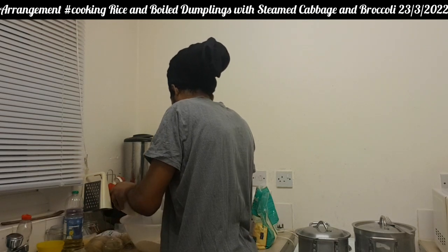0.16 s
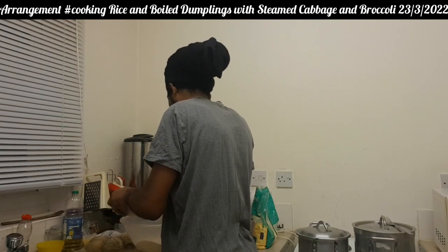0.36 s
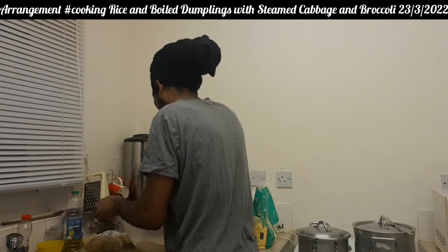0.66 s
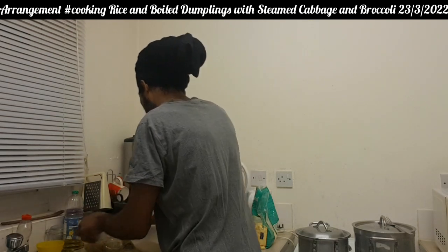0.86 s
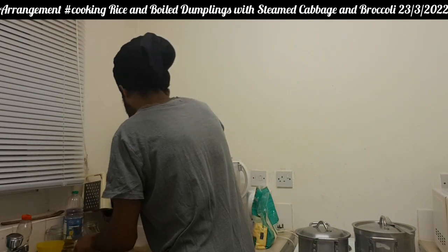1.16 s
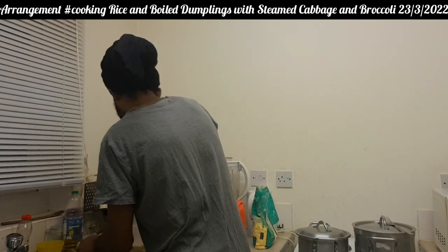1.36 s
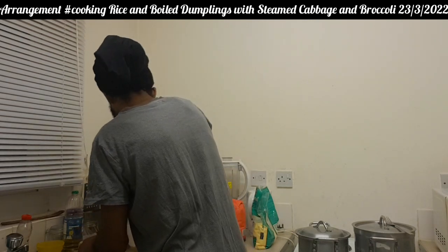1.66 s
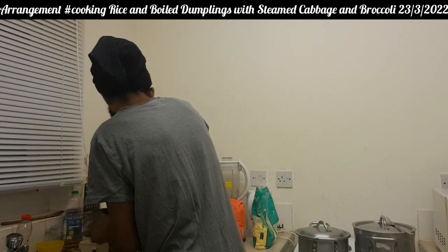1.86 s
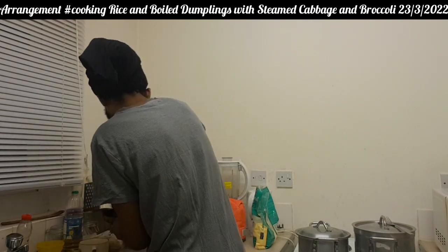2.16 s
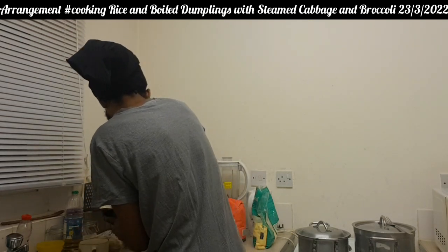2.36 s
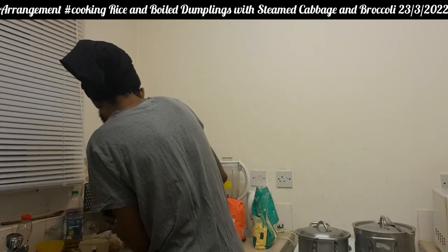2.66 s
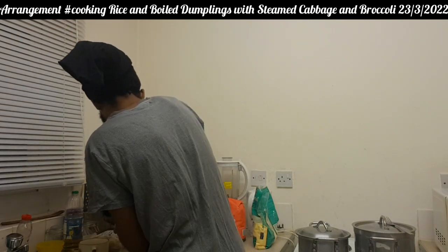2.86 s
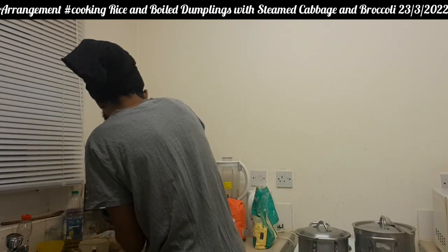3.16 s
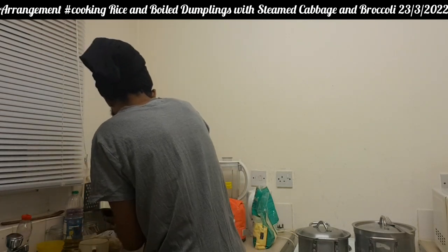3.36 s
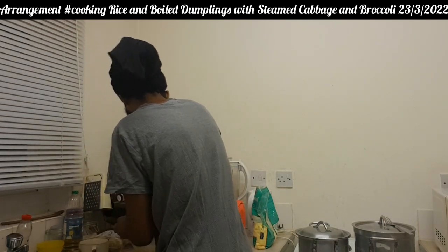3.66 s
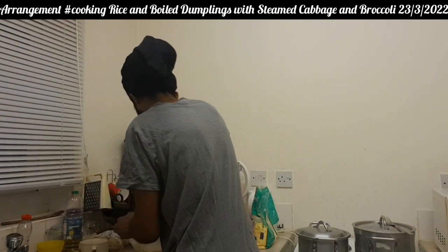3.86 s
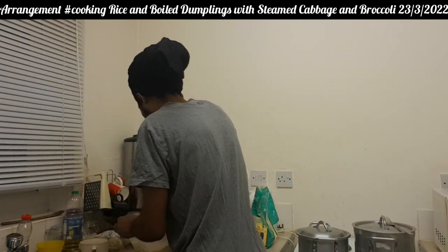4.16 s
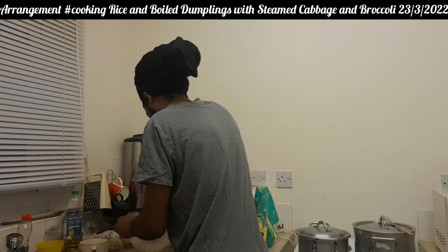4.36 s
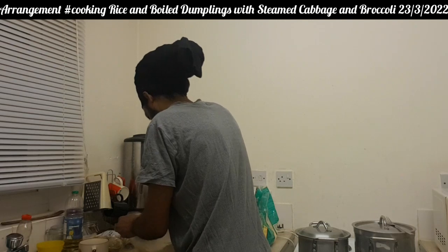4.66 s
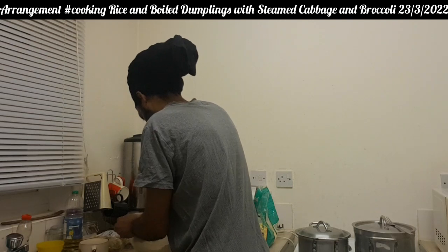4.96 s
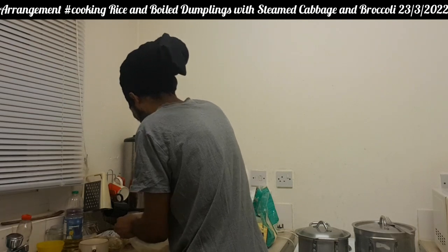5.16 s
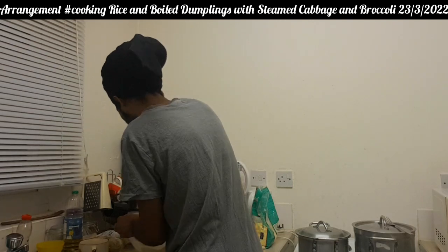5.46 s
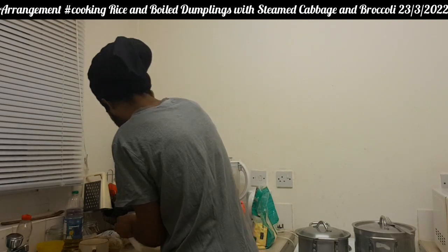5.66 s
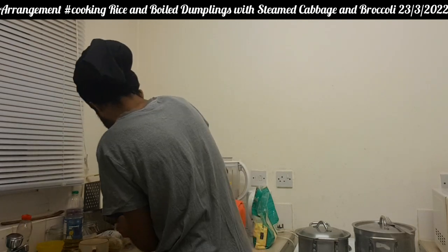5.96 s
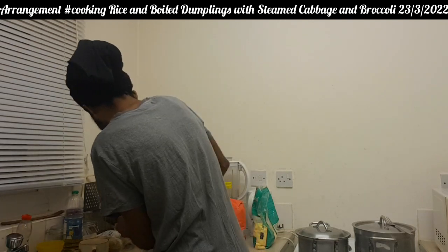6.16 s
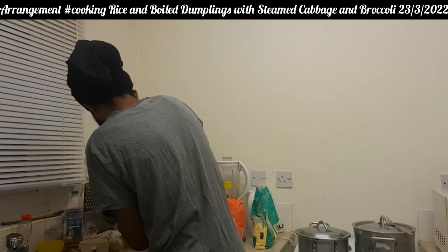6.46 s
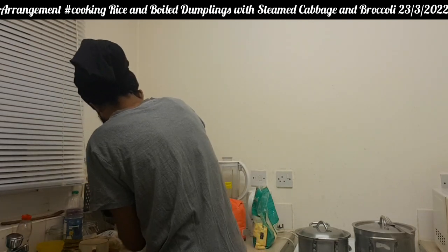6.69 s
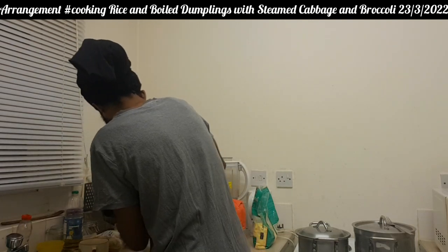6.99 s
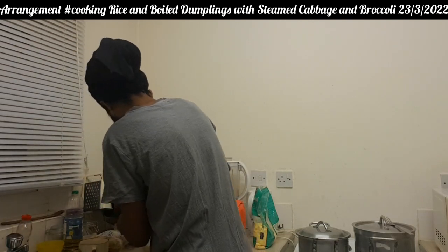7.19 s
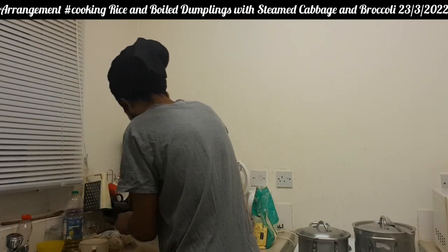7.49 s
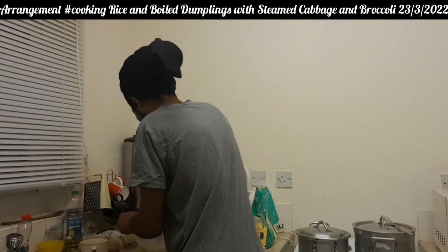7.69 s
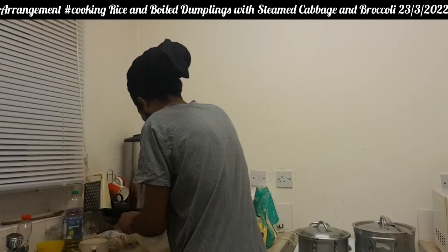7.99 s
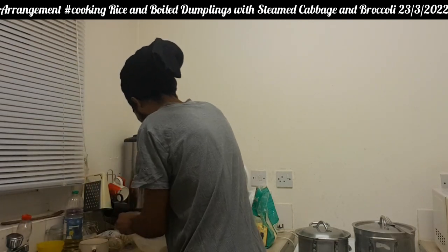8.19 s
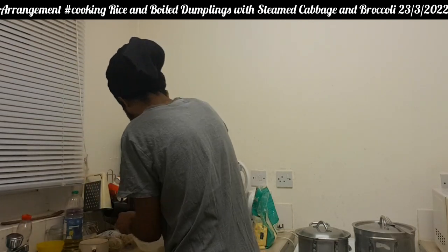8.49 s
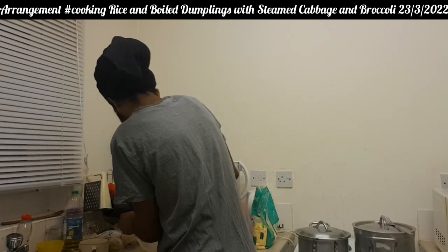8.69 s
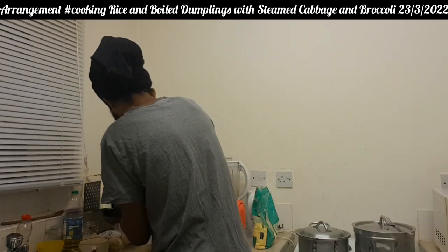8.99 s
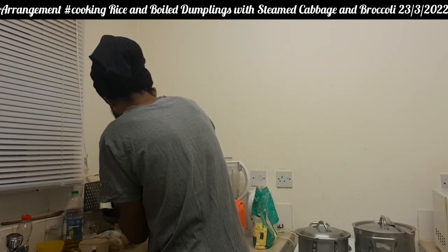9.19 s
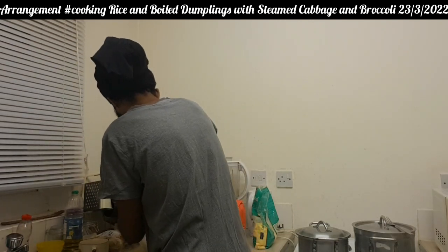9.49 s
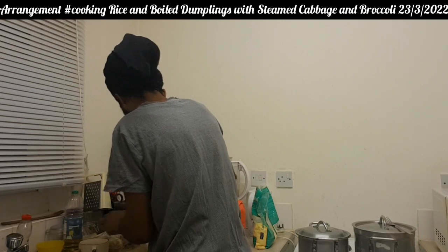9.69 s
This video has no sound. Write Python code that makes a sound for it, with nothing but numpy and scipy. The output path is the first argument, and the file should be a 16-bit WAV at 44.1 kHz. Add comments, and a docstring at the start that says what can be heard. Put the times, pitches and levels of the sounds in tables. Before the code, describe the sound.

Dry, grainy hand strokes against a bowl, with a thin flour hiss and a muted ring from the wall. A single hard knock early on stands far above everything else, its clack and boom dying quickly. Then quiet, uneven rubbing continues to the end, with a double tap midway and small bumps. Heard in stereo from a few steps off in a small reflective kitchen with faint, slowly swelling room noise.

```python
"""Hands mix and press flour dough in a bowl on a kitchen counter, a few steps from a two-port microphone.
A faint, slowly swelling room noise lies under everything, and a faint stroke is already under way.
Harder strokes follow, grains scraping and ringing the bowl wall under a dry flour hiss; at 1.27 s comes
the loudest knock: bowl, rim and clack ring from a short push, and the counter booms.
Then strokes overlap to the end among softer knocks, all blurred by decaying noise tails of a small hard room."""
import sys
import numpy as np
from scipy import signal
from scipy.fft import rfft, irfft, next_fast_len
from scipy.io import wavfile
from scipy.ndimage import uniform_filter1d

SR = 44100
rng = np.random.default_rng(int(sys.argv[2]) if len(sys.argv) > 2 else 0)


def amplitude_ratio(level_db):
    """Convert a level in decibels to the matching linear amplitude (field) ratio."""
    exponent = np.asarray(level_db, float) / 20
    return 10 ** exponent


def wav_record(signal):
    """Record a signal, one row per channel, as 16-bit PCM in the file named by sys.argv[1]."""
    frames = np.transpose(np.atleast_2d(signal))
    bounded = np.clip(frames, -1, 1)
    # unit amplitude maps onto the largest positive 16-bit level
    quanta = np.round(bounded * 32767).astype(np.int16)
    wavfile.write(sys.argv[1], SR, quanta)


N = 433944

# Strokes of the hands. Each row: start in seconds, length in seconds, share of the length before the peak (0-1),
# then relative levels in dB of the grit, the dry flour hiss and the ring of the bowl wall.
HAND_STROKES = [(-.12, 0.54, 0.26, -74, -82, -75), (0.303, 0.31, 0.6, -56.5, -71, -59),
                (0.429, 0.19, 0.3, -48.5, -77, -51.5), (0.545, 0.19, 0.38, -46.5, -67.5, -49.5),
                (0.823, 0.33, .42, -54.5, -70.5, -55.5), (1.261, 0.33, 0.12, -45, -65, -43.5),
                (1.581, 0.26, .3, -58.5, -72, -52.5), (1.661, 0.36, 0.4, -50.5, -69.5, -60),
                (2.004, 0.053, 0.13, -53.5, -74, -70), (2.06, .25, .32, -54.5, -70.5, -62),
                (2.355, 0.42, 0.1, -54, -70.5, -63.5), (2.857, 0.22, 0.4, -53.5, -71.5, -55),
                (3.015, 0.37, 0.27, -57, -78, -55), (3.171, 0.31, 0.46, -55.5, -69, -68),
                (3.452, 0.32, 0.24, -63.5, -74.5, -91), (3.808, 0.32, 0, -63, -79, -75),
                (4.179, 0.31, 0.31, -56.5, -75.5, -58), (4.493, 0.29, 0.47, -56, -68.5, -67.5),
                (4.827, 0.35, 0.23, -56, -67, -65.5), (5.183, 0.34, 0.1, -53, -67.5, -63),
                (5.456, 0.06, 0.47, -55, -87, -53), (5.52, 0.28, 0.06, -52, -68, -75),
                (5.635, 0.39, 0.2, -56, -70, -59), (5.816, 0.15, 0.68, -59.5, -81, -66.5),
                (6.077, 0.37, 0.19, -57, -71, -65), (6.245, 0.24, 0.45, -58.5, -75, -65),
                (6.5, 0.19, 0.38, -60.5, -75, -59), (6.61, 0.56, 0.03, -55.5, -73, -66),
                (6.97, 0.33, 0.2, -56.5, -71, -60), (7.335, 0.3, 0.14, -53.5, -69, -57),
                (7.483, 0.28, 0.53, -57, -70, -64), (7.739, .07, 0, -57.5, -73.5, -67),
                (7.77, 0.36, 0.25, -53, -68, -58), (7.98, 0.75, 0.05, -53.5, -66.5, -62.5),
                (8.146, .22, 0.28, -47.5, -62.5, -57), (8.265, 0.17, 0.7, -52.5, -64.5, -58),
                (8.596, 0.36, 0.1, -53, -69.5, -72), (8.723, 0.23, 0.58, -56.5, -72, -66),
                (9.015, 0.25, 0.65, -51.5, -66.5, -67), (9.167, 0.23, 0.34, -55, -71, -68),
                (9.288, 0.4, 0.25, -56.5, -71.5, -66.5), (9.573, 0.2, 0.34, -66.5, -81.5, -62)]
# Tones of the bowl's body. Each row: frequency in Hz, relative level in dB, time to fall 60 dB in seconds.
BOWL_MODES = [(215, -3, 0.091), (261, -0.5, 0.048), (321.5, -0.5, .08), (369.6, -2.5, 0.093),
              (451.3, 0, 0.062), (468, -7, 0.35), (493, 0.5, 0.12), (556.6, -1.5, 0.089)]
# Tones of the counter. Each row: frequency in Hz, relative level in dB, time to fall 60 dB in seconds.
COUNTER_MODES = [(115.7, -8, 0.12), (137.7, 0, 0.3), (150.1, -16.5, 0.28), (157, -11, 0.26)]
# Tones of the bowl's rim. Each row: frequency in Hz, relative level in dB, time to fall 60 dB in seconds.
RIM_MODES = [(686, -2.5, 0.049), (767, -5.5, 0.059), (871, -4, .06), (1057, -4.5, 0.041)]
# Decay of the kitchen. Each row: frequency in Hz, time to fall 60 dB in seconds.
KITCHEN_DECAY = [(100, 0.59), (400, 0.28), (1200, 0.45), (3000, 0.22), (8000, 0.17), (13000, 0.1)]


def evened(x):
    """Scales to rms 1."""
    return x / np.sqrt(np.mean(x ** 2) + 1e-20)


def read(points, hz):
    """Reads a curve of (Hz, value) rows on a log-frequency axis."""
    f, value = np.transpose(points)
    return np.interp(np.log(hz + 1), np.log(f + 1), value)


def coloured(x, spectrum):
    """Filters x by a spectrum in dB, then scales it to rms 1."""
    size = next_fast_len(N)
    gain = amplitude_ratio(read(spectrum, np.fft.rfftfreq(size, 1 / SR)))
    return evened(irfft(rfft(x, size) * gain, size)[..., :N])


def wander(samples):
    """Random curve of rms 1, smoothed over this many samples."""
    return evened(uniform_filter1d(rng.standard_normal(N), size=samples))


def ring(modes):
    """The dying tones of a part, peak 1; neighbours start in opposite directions."""
    t = np.arange(SR // 3)[:, None] / SR
    hz, db, t60 = np.transpose(modes)
    tones = amplitude_ratio(db - 60 * t / t60) * np.sin(2 * np.pi * hz * t)
    total = tones @ (-1.) ** np.arange(len(hz))
    return total / abs(total).max()


def room_noise():
    """Faint two-sided noise of a fixed colour that swells slowly."""
    # Spectrum of the room noise. Each row: frequency in Hz, relative density in dB per Hz.
    air = [(12, -40.5), (20, 13), (186, -6), (290, -13), (748, -14), (1500, -14), (1630, -7.5), (1780, -14),
           (3370, -21.5), (6950, -33.5), (10000, -33), (12000, -29.5), (15600, -23), (16100, -57.5)]
    swell = amplitude_ratio(0.44 * wander(12000))
    return amplitude_ratio(-64) * swell * coloured(rng.standard_normal((2, N)), air)


def echoes(count):
    """Stereo room tails: strong echoes off the near walls, then a decay band by band; each spot has its own."""
    hz, t, z = signal.stft(rng.standard_normal((count, 2, SR // 2)), SR, nperseg=512)
    decay = amplitude_ratio(-60 * t / read(KITCHEN_DECAY, hz)[:, None])
    tails = signal.istft(z * decay, SR, nperseg=512)[1]
    t = np.arange(tails.shape[2]) / SR
    onset = np.minimum(t / 0.0015, 1)
    tails *= onset * (1 + 0.47 * np.exp(-t / 0.0075))
    return tails / np.sqrt((tails ** 2).sum(2).mean())


def blur(x):
    """The hands never stay put, so their reverberation keeps only its energy, dying band by band."""
    hz, t, z = signal.stft(x, SR, nperseg=512, noverlap=384)
    keep = amplitude_ratio(-120 * t[1] / read(KITCHEN_DECAY, hz))  # share of the power left after one frame
    power = np.array([signal.lfilter([0, 1 - k], [1, -k], abs(row) ** 2) for k, row in zip(keep, z)])
    real, imaginary = rng.standard_normal((2, 2, *power.T.shape)).transpose(0, 1, 3, 2)
    noise = np.sqrt(abs(power)) * (real + 1j * imaginary)
    return signal.istft(noise, SR, nperseg=512, noverlap=384)[1][:, :N]


def knocks():
    """Each blow is a short push; every part rings as hard as the blow reaches it. Returns direct, diffuse."""
    # Blows on bowl and counter. Each row: time in seconds, then relative levels in dB of the bowl body,
    # the counter boom, the rim, the clack and the dull thud.
    blows = [(0.888, -55, -65, -73, -47, -53.5), (1.269, -16, -17.5, -12, -14.5, -58),
             (1.609, -42.5, -25, -50.5, -40.5, -37), (2.002, -43.5, -49, -32.5, -33, -55),
             (2.126, -57, -54, -41, -34.5, -54), (2.527, -53, -51, -54, -63, -53),
             (2.89, -30.5, -49, -43, -41, -51), (3.071, -70, -75, -35, -31.5, -73),
             (3.155, -40.5, -48, -50, -29, -58), (4.225, -44, -52, -50, -44, -54),
             (4.512, -37, -46, -50.5, -43.5, -53), (4.836, -40, -66, -54, -34.5, -50),
             (4.85, -36.5, -47.5, -42.5, -58, -53), (5.399, -51, -70, -48, -44, -69),
             (5.472, -27.5, -38.5, -34.5, -29.5, -43), (5.543, -27.5, -39, -33, -26, -44),
             (6.093, -39, -48, -60, -28, -46), (6.252, -43.5, -46.5, -45.5, -44, -41.5),
             (6.56, -50, -48.5, -63, -49, -44.5), (7.35, -38.5, -46, -47.5, -45, -44),
             (7.745, -50, -53, -49, -49, -62), (8.004, -46.5, -57, -55, -51, -46),
             (8.167, -48.5, -69, -55, -40, -74), (8.595, -33, -43, -51, -38.5, -60),
             (8.634, -30, -40, -41, -35.5, -53), (9.081, -52.5, -57.5, -53, -55, -55),
             (9.659, -50, -61, -48, -44.5, -58)]
    # Short tones of the clack. Each row: frequency in Hz, relative level in dB, time to fall 60 dB in seconds.
    clack_modes = [(1228, -2, 0.013), (1520, 3, 0.0058), (1813, 2.5, 0.0061), (2230, 0.5, 0.0056),
                   (2800, 2.5, 0.0027), (3370, -1, 0.0031), (4340, -7, 0.0022)]
    # Low tones of the thud. Each row: frequency in Hz, relative level in dB, time to fall 60 dB in seconds.
    thud_modes = [(50, -11.5, 0.062), (79.1, 6.5, 0.23)]
    u = np.arange(200) / SR / 0.00008  # the push peaks after 0.08 ms
    push = u * np.exp(-u)
    all_modes = (BOWL_MODES, COUNTER_MODES, RIM_MODES, clack_modes, thud_modes)
    parts = np.array([np.convolve(ring(modes), push)[:SR // 3] for modes in all_modes])
    # the cupboard under the counter takes a moment to boom
    parts[1] *= np.minimum(np.arange(SR // 3) / SR / 0.033, 1)
    parts /= abs(parts).max(1)[:, None]
    direct, diffuse = np.zeros(N + SR), np.zeros((2, N + SR))
    for (seconds, *parts_db), tail in zip(blows, echoes(count=len(blows))):
        bowl, counter, rim, clack, thud = amplitude_ratio(parts_db)[:, None] * parts
        blow = amplitude_ratio(-4.5) * (bowl + rim + clack)
        bass = amplitude_ratio(1.5) * (counter + thud)  # too long a wave to scatter: it stays out of the echoes
        at = round(seconds * SR)
        direct[at:][:len(blow)] += amplitude_ratio(2.5) * blow + bass
        wet = signal.fftconvolve(blow[None], tail, axes=1)
        diffuse[:, at:][:, :wet.shape[1]] += amplitude_ratio(7) * wet
    return direct[:N], diffuse[:, :N]


def arches(peaks_db, late_share, start_db, end_db, offset_db):
    """Gain of one layer: every stroke swells to its peak and dies away; overlapping strokes add in power."""
    arch_power = 2.1  # higher = flatter top, steeper flanks
    start, length, peak = np.transpose(HAND_STROKES)[:3, :, None]
    t = np.arange(0, N / SR + .004, .002)
    u = (t - start) / length
    peak = np.clip(peak + late_share, .05, .95)
    rise_db = start_db * abs(1 - u / peak) ** arch_power
    fall_db = end_db * abs((u - peak) / (1 - peak)) ** arch_power
    down_db = np.where(u < peak, rise_db, fall_db)
    power = (amplitude_ratio(peaks_db[:, None] + offset_db - down_db) ** 2).sum(0)
    return np.interp(np.arange(N) / SR, t, np.sqrt(power))


def strokes():
    """Dense uneven grains slip along the wall and set it ringing; returns scrape, flour hiss, two-sided ring."""
    # Spectrum of the coarse scrape. Each row: frequency in Hz, relative density in dB per Hz.
    coarse_colour = [(40, -12.5), (135, 0), (200, -32.5), (700, -4.5), (1200, -1.5), (1400, 0.5),
                     (2000, -0.5), (2600, -3.5), (4000, -38), (9000, -76.5)]
    # Spectrum of the fine scrape. Each row: frequency in Hz, relative density in dB per Hz.
    fine_colour = [(800, -41), (2000, -12), (2640, -3.5), (3300, 0), (4500, -5.5), (7000, -13), (8500, -27),
                   (11000, -87.5)]
    # Spectrum of the dry flour hiss. Each row: frequency in Hz, relative density in dB per Hz.
    flour_colour = [(5000, -22), (8000, -6), (10000, -6.5), (12500, 2), (15700, 0.5), (16300, -47)]
    grit_db, hiss_db, wall_db = np.transpose(HAND_STROKES)[3:]
    coarse = arches(grit_db, late_share=.01, start_db=14, end_db=27.3, offset_db=2.3)
    fine = arches(grit_db, late_share=0.012, start_db=15.5, end_db=23.4, offset_db=0.3)
    hiss = arches(hiss_db, late_share=.03, start_db=22, end_db=22, offset_db=0.3)
    # the wall stirs faintly between strokes
    body = arches(wall_db, late_share=.08, start_db=31, end_db=32, offset_db=0.18) + amplitude_ratio(-73)
    rim = arches(wall_db, late_share=0.2, start_db=18, end_db=22, offset_db=-2.5) + amplitude_ratio(-84.5)

    grains_per_s, grain_spread_db = 7000, 1
    sizes = amplitude_ratio(grain_spread_db * np.minimum(rng.exponential(1, N), 5))
    grains = sizes * (rng.random(N) < grains_per_s / SR)
    grains *= rng.choice([-1., 1.], N)
    judder = amplitude_ratio(2.0 * wander(700) + 1.3 * wander(2500))  # the hand sticks and slips
    scrape = judder * (coarse * coloured(grains, coarse_colour) + fine * coloured(grains, fine_colour))
    flour = judder ** 0.49 * hiss * coloured(grains, flour_colour)

    rubbing = judder * rng.standard_normal((2, N))
    bowl_ring, rim_ring, counter_ring = [
        evened(signal.oaconvolve(rubbing, ring(modes)[None], axes=1)[:, :N])
        for modes in (BOWL_MODES, RIM_MODES, COUNTER_MODES)]
    wall = body * (bowl_ring + amplitude_ratio(-11.0) * counter_ring) + rim * rim_ring
    return scrape, flour, wall


def two_ports(direct, diffuse):
    """Direct sound is shared, diffuse sound is alike by frequency; then level and phase part the two ports."""
    # Likeness of the diffuse sound at the ports. Each row: frequency in Hz, likeness (0-1).
    likeness = [(60, 0.66), (150, 0.79), (300, 0.74), (500, 0.94), (1000, 0.24), (2000, 0.026),
                (5000, 0.25), (8000, 0.28), (12000, 1)]
    # Phase between the ports. Each row: frequency in Hz, lead of the left port in radians.
    left_lead = [(60, 0), (150, -.15), (300, -.45), (500, -.95), (1200, -1.4), (3000, -1.5), (6500, -1.4),
                 (9000, -.2), (16000, 0)]
    # Level between the ports. Each row: frequency in Hz, left minus right in dB.
    left_louder = [(60, 0), (130, -1), (290, -1.5), (640, -2.0), (1410, -3), (3100, -2), (6820, -9.5),
                   (15000, -3.5)]
    size = next_fast_len(N)
    hz = np.fft.rfftfreq(size, 1 / SR)
    direct = rfft(direct, size)
    left, other = rfft(diffuse, size)
    same = np.clip(read(likeness, hz), 0, 1)
    right = same * left + np.sqrt(1 - same ** 2) * other
    # each port takes half of the difference
    half = amplitude_ratio(read(left_louder, hz) / 2) * np.exp(.5j * read(left_lead, hz))
    return irfft(np.array([(direct + left) * half, (direct + right) / half]), size)[:, :N]


def scene():
    """Sums the direct sound of hands and knocks, and the diffuse sound of kitchen and wall, at the two ports."""
    blows, blow_echoes = knocks()
    scrape, flour, wall = strokes()
    # the bowl stays in its corner: one fixed short tail
    corner = echoes(count=1)[0, :, :SR // 10]
    near = amplitude_ratio(-6.5) * signal.oaconvolve(scrape[None], corner, axes=1)[:, :N]
    blurred = amplitude_ratio(-2.5) * blur(scrape + amplitude_ratio(-3) * flour)
    direct = blows + amplitude_ratio(-9) * scrape + amplitude_ratio(-1) * flour
    diffuse = blow_echoes + blurred + near + wall + room_noise()
    return two_ports(direct, diffuse)


def low_pass(x):
    """Removes everything above the highest recorded frequency."""
    return signal.sosfilt(signal.butter(12, 15800, fs=SR, output="sos"), x)


def record(dry):
    """The microphone drops the deepest bass, below 61 Hz."""
    low_cut = signal.butter(2, 61, "high", fs=SR, output="sos")
    heard = signal.sosfilt(low_cut, dry)
    return low_pass(heard)


dry = scene()
out = record(dry)
wav_record(out)
```